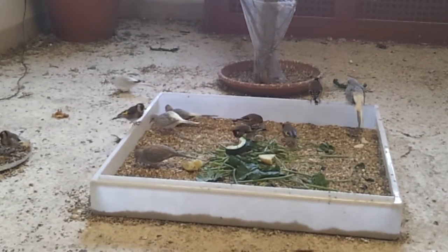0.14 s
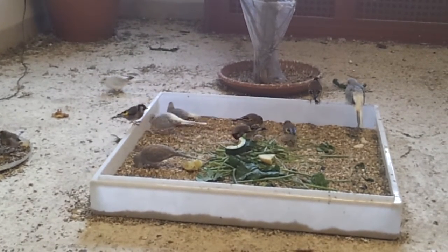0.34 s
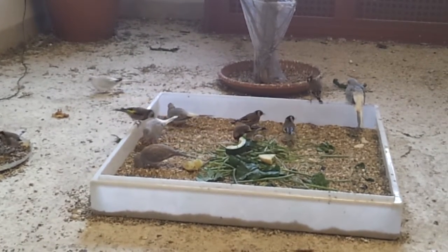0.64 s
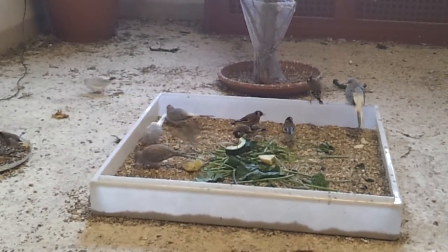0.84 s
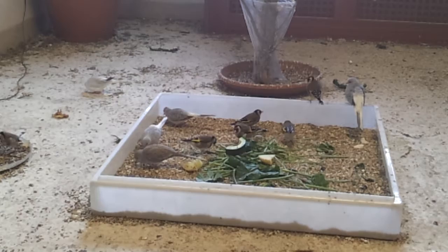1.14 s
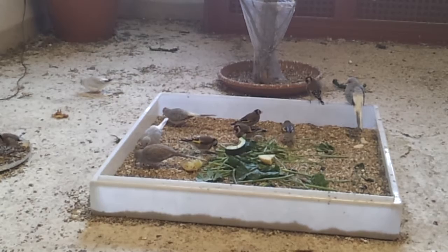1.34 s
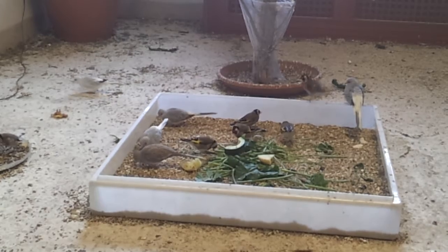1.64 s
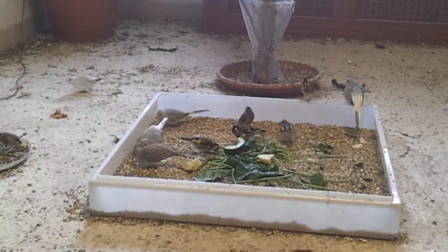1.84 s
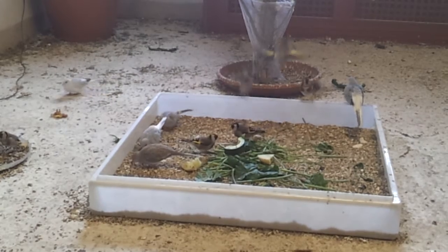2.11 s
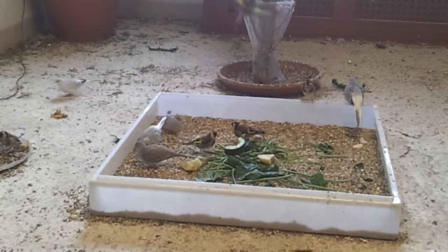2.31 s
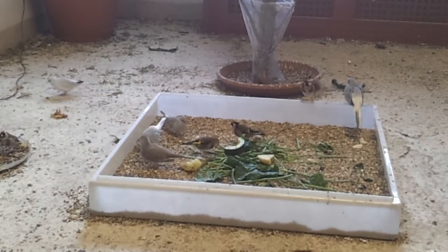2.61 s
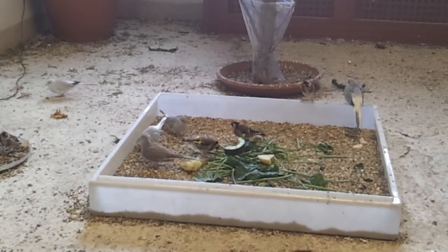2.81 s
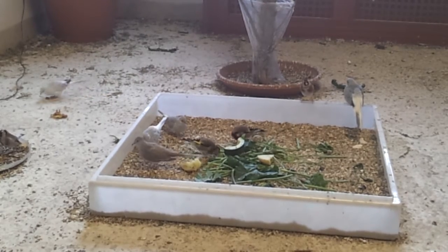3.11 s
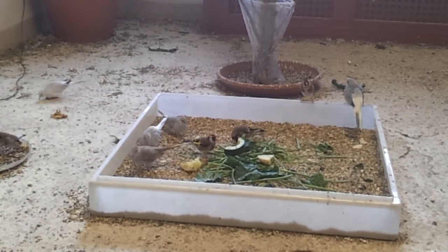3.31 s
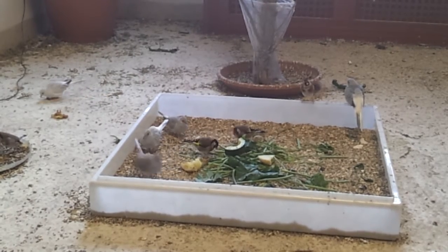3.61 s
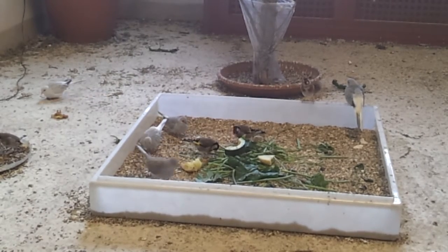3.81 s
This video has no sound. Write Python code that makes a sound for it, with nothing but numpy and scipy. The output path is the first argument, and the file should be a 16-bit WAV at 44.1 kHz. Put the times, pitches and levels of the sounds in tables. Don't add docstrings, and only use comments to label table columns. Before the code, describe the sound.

High, sharp finch twitter, near the microphone in a bare reverberant aviary, begins after quiet pecking and foot scuffs and a quick flurry of wing claps; wings whirr underneath and a rapid trill closes it.

```python
import sys
import numpy as np
from scipy import signal
from scipy.io import wavfile
from scipy.ndimage import minimum_filter1d

SR = 44100
rng = np.random.default_rng(int(sys.argv[2]) if len(sys.argv) > 2 else 0)


def to_wav(s):
    ch = np.atleast_2d(s).T
    pcm = np.round(np.clip(ch, -1, 1) * 32767)
    wavfile.write(sys.argv[1], SR, pcm.astype(np.int16))


def gain_from_db(level_db):
    decades = np.asarray(level_db, float) / 20
    return 10 ** decades


N = 174195

# start in seconds, length in seconds, start pitch in Hz, end pitch in Hz, level in dB.
SLURRED_NOTES = [(2.177, 0.015, 5020, 4180, -38), (2.184, 0.021, 4204, 4114, -35),
                 (2.256, 0.01, 4145, 4120, -25.5), (2.267, .015, 4070, 5030, -28),
                 (2.29, 0.016, 4980, 5400, -34), (2.285, 0.026, 4400, 3630, -31.5),
                 (2.385, 0.06, 5510, 5180, -36.5), (2.398, .012, 3264, 5250, -26.5),
                 (2.408, 0.021, 4530, 4010, -28.5), (2.425, 0.012, 4840, 5390, -37),
                 (2.472, 0.028, 5500, 5520, -35.5), (2.503, 0.032, 3826, 4790, -26.5),
                 (2.548, 0.031, 5286, 5220, -29.5), (2.61, 0.014, 2200, 3880, -36),
                 (2.615, 0.023, 5100, 5390, -34.5), (2.627, 0.018, 3950, 4500, -23),
                 (2.665, 0.026, 4270, 4330, -37.5), (2.665, 0.012, 5400, 5400, -44.5),
                 (2.69, 0.022, 3314, 3710, -33.5), (2.735, 0.017, 4450, 3240, -33),
                 (2.832, 0.022, 3810, 3610, -29), (2.89, 0.027, 3683, 4250, -31.5),
                 (2.9, 0.031, 4950, 5530, -40.5), (3.255, 0.075, 4950, 5560, -42)]
# start in seconds, level in dB.
CHIP_CALLS = [
    (2.953, -23.5),
    (3.07, -23.5),
    (3.186, -24),
    (3.305, -24),
    (3.386, -48),
]
# start in seconds, level in dB.
TRILL_SYLLABLES = [
    (3.469, -25.5),
    (3.542, -24),
    (3.616, -24.5),
    (3.69, -25),
    (3.76, -23.5),
    (3.835, -23),
    (3.91, -37),
]
# delay in seconds, length in seconds, start pitch in Hz, end pitch in Hz,
# level in dB.
SYLLABLE_PARTS = [
    (-.012, 0.05, 3234, 3620, -19),
    (0, 0.0347, 4224, 4424, -2.5),
    (0.026, 0.0275, 5103, 5256, 0.5),
    (0.031, 0.039, 6850, 6250, -16.5),
]
# start in seconds, length in seconds, start pitch in Hz, end pitch in Hz, level in dB.
CLEAR_NOTES = [(2.096, 0.014, 2764, 3335, -34), (2.104, 0.018, 3310, 3226, -29),
               (2.134, .012, 3265, 3280, -29), (2.213, 0.016, 3000, 2720, -29),
               (2.27, 0.021, 2990, 2500, -38), (2.388, 0.023, 2978, 2827, -28.5),
               (2.445, 0.0194, 3520, 3185, -30), (2.455, 0.025, 3317, 2740, -29.5),
               (2.49, 0.022, 3060, 3410, -37.5), (2.728, 0.011, 6600, 6600, -54),
               (2.795, 0.026, 3000, 3325, -31.5), (3.052, 0.022, 6480, 5710, -34.5),
               (3.178, 0.019, 3160, 3236, -28), (3.19, 0.027, 6100, 5830, -42),
               (3.29, 0.017, 3450, 3180, -32.5), (3.29, 0.023, 6270, 6230, -38),
               (3.372, 0.021, 7400, 7500, -40.5), (3.39, 0.018, 7790, 7920, -44.5),
               (3.4, 0.047, 5610, 5713, -23.5), (3.495, 0.036, 5660, 5610, -28.5),
               (3.92, 0.056, 5930, 6290, -23.5)]
SQUEAK_NOTE = [
    (2.357, 0.025, 6960, 6500, -30.5),
]
# start in seconds, length in seconds, start pitch in Hz, end pitch in Hz, level in dB.
HOARSE_NOTES = [
    (2.905, 0.022, 2810, 2680, -31.5),
    (3.0, .02, 1976, 2480, -43),
    (3.022, 0.031, 2802, 2374, -33),
    (3.1, 0.025, 2098, 2600, -46),
    (3.125, 0.038, 2693, 2966, -33),
    (3.265, 0.022, 2865, 2706, -29),
    (3.375, 0.021, 1800, 2520, -43.5),
]
# start in seconds, length in seconds, start pitch in Hz, end pitch in Hz, level in dB.
FAR_CHIRPS = [
    (.37, 0.037, 7800, 6200, -56.5),
    (.83, 0.026, 7500, 6300, -55),
    (1.33, 0.086, 6800, 6850, -59),
]

# start in seconds, peak in dB.
WING_CLAPS = [(1.8435, -20.5), (1.854, -32.5), (1.872, -18), (1.888, -29), (1.9005, -19.5), (1.912, -28),
              (1.924, -26.5), (1.932, -25), (1.945, -27), (1.9612, -20.5), (1.978, -27)]
# frequency in Hz, level in dB, 60 dB decay time in seconds.
CLAP_RESONANCES = [(542, -12, 0.02), (678, -13.5, 0.031), (1065, -12, 0.019), (1460, -15, 0.0032),
                   (1800, -13.5, 0.009), (2200, -14, 0.008), (4500, -16, 0.0044)]
# time in seconds, level in dB.
WHIRR_LEVEL = [(1.8, -87), (2.0, -48), (2.15, -39.5), (2.35, -34), (2.7, -33), (2.9, -41.5), (3.05, -38),
               (3.3, -37.5), (3.45, -46), (3.6, -48.5), (3.9, -66)]
# frequency in Hz, density in dB per Hz.
WHIRR_SPECTRUM = [(30, -32), (100, 0), (300, 3), (700, -9.5), (2000, -3.5), (7000, -1.5), (10000, -22),
                  (15000, -63.5)]

# start in seconds, peak in dB.
SEED_PECKS = [
    (0.5113, -36),
    (0.6534, -46),
    (0.823, -35),
    (1.265, -41),
    (1.3308, -33.5),
    (1.8125, -61),
    (2.2195, -37),
]
# start in seconds, peak in dB.
FOOT_SCUFFS = [(.38, -62), (.8, -41), (1.27, -39.5), (1.33, -38.5), (1.43, -36.5), (1.49, -60), (1.7, -45),
               (2.85, -31), (2.95, -33.5), (3.38, -33.5), (3.46, -46.5)]
# start in seconds, peak in dB.
RIM_KNOCKS = [
    (.8, -46),
    (2.1, -36),
    (2.28, -42),
    (3.13, -40),
    (3.19, -36),
]
# time in seconds, level in dB.
RUSTLE_LEVEL = [(0, -47), (.15, -51), (.42, -48), (.76, -53), (.83, -40), (1.05, -58), (1.25, -53),
                (1.34, -44.5), (1.65, -60), (1.85, -45.5), (2.1, -57)]
# frequency in Hz, density in dB per Hz.
SEED_SPECTRUM = [(710, -41.5), (1200, 9), (1870, 0), (2600, -6), (5270, 2), (7080, 7.5), (13900, -9.5),
                 (15000, -7)]

# time in seconds, level in dB.
MOTOR_LEVEL = [(0, -48), (2.6, -89), (3.1, -54), (3.3, -40.5), (3.5, -46.5), (3.95, -55.5)]
# time in seconds, level in dB.
AIR_SWELL = [(0, -49.5), (.25, -54.5), (.45, -43), (.85, -51), (1.05, -55), (1.25, -58), (1.45, -49),
             (1.8, -52.5), (2.3, -43), (3.3, -44.5), (3.6, -53.5), (3.95, -57)]
# frequency in Hz, density in dB per Hz.
AIR_SPECTRUM = [(21, -40), (35, -16), (64, -8), (151, -7), (357, -7.5), (750, -12.5), (2570, -21.5),
                (9000, -24), (11700, -60), (19800, -120)]
# frequency in Hz, rms level in dB.
HUM_PARTIALS = [(43, -53), (64, -52.5), (109, -58)]

# frequency in Hz, left-right likeness from -1 to 1.
EAR_LIKENESS = [(60, -0.15), (240, 0.94), (950, 0.095), (3770, -0.1), (15000, -0.057)]
# frequency in Hz, left minus right in dB.
EAR_LEAN = [(60, 6), (380, 0), (2380, -0.5), (15000, -6)]
# frequency in Hz, 60 dB decay time in seconds.
ROOM_DECAY = [(300, 1), (1500, 0.97), (4000, 0.83), (8000, 0.56), (14000, 0.089)]


def sing(notes, warble_hz, wobble_hz, breath_db, octave_db):
    attack_s, release_s, warble_per_s, fade_db = 0.0023, 0.0013, 70, -5.5
    out = np.zeros(N + SR)
    shake = rms_one(signal.lfilter([1], [1, -0.95], rng.standard_normal(N + SR)))
    hiss = np.diff(rng.standard_normal(N + SR + 1))
    for start, length, hz0, hz1, db in notes:
        t = np.arange(int(length * SR)) / SR
        i = int(start * SR)
        j = i + len(t)
        glide = hz0 + (hz1 - hz0) * np.sin(np.pi / 2 * t / length) ** 2
        warble = warble_hz * (t / length) ** 1.4 * np.sin(2 * np.pi * warble_per_s * t)
        phase = 2 * np.pi * np.cumsum(glide + warble + wobble_hz * shake[i:j]) / SR
        ramp = np.clip(np.minimum(t / attack_s, (length - t) / release_s), 0, 1)
        envelope = gain_from_db(db + fade_db * t / length) * np.sin(np.pi / 2 * ramp) ** 2
        voice = np.sin(phase) + gain_from_db(octave_db) * np.sin(2 * phase) + gain_from_db(breath_db) * hiss[i:j]
        out[i:j] += envelope * voice
    return out[:N]


def trill():
    notes = []
    for start, db in TRILL_SYLLABLES:
        for delay, length, hz0, hz1, part_db in SYLLABLE_PARTS:
            notes.append((start + delay, length, hz0 * rng.normal(1, 0.007), hz1, db + part_db))
    return sing(notes, warble_hz=30, wobble_hz=46, breath_db=-73, octave_db=-76)


def first_singer():
    slurs = sing(SLURRED_NOTES, warble_hz=118.4, wobble_hz=110, breath_db=-32.5, octave_db=-24)
    chip_notes = [(start, 0.034, 3990, 3950, db) for start, db in CHIP_CALLS]
    chips = sing(chip_notes, warble_hz=776, wobble_hz=87, breath_db=-42, octave_db=-47)
    return placed(slurs + chips + trill(), pan_db=-3, lag_s=0.000438, direct_db=6.5, room_db=9.5)


def second_singer():
    pips = sing(CLEAR_NOTES, warble_hz=30, wobble_hz=94.4, breath_db=-50, octave_db=-56)
    squeak = sing(SQUEAK_NOTE, warble_hz=146.6, wobble_hz=51, breath_db=-41, octave_db=-11)
    return placed(pips + squeak, pan_db=-6, lag_s=0.000357, direct_db=0, room_db=5)


def third_bird():
    croaks = sing(HOARSE_NOTES, warble_hz=250, wobble_hz=200, breath_db=-27.5, octave_db=-21)
    return placed(croaks, pan_db=-4, lag_s=0.00045, direct_db=-1.5, room_db=6)


def bursts(events, decay_s, low_hz, high_hz):
    clicks = np.zeros(N)
    for start, db in events:
        clicks[int(start * SR)] = gain_from_db(db)
    envelope = signal.lfilter([1], [1, -np.exp(-1 / (decay_s * SR))], clicks + 1e-18)
    return clicks, band_pass(envelope * rng.standard_normal(N), low_hz, high_hz)


def take_off():
    clicks, out = bursts(WING_CLAPS, decay_s=0.0023, low_hz=1150, high_hz=7500)
    out = out + gain_from_db(-4) * band_pass(clicks, 2000, 11000)
    for k, (hz, db, t60) in enumerate(CLAP_RESONANCES):
        r, w = gain_from_db(-60 / (t60 * SR)), 2 * np.pi * hz / SR
        ring = signal.lfilter([0, np.sin(w)], [1, -2 * r * np.cos(w), r * r], clicks + 1e-18)
        out = out + (-1) ** k * gain_from_db(db) * ring
    return band_pass(out, 420, 11500, order=3)


def claps_and_pecks():
    pecks = bursts(SEED_PECKS, decay_s=0.00058, low_hz=4950, high_hz=11500)[1]
    return placed(take_off() + gain_from_db(1) * pecks, pan_db=-3, lag_s=0.00041, direct_db=5.5, room_db=7.5)


def wing_whirr():
    wingbeat_hz, beat_db = 8.3, 2
    beat = beat_db * np.sin(2 * np.pi * wingbeat_hz * np.arange(N) / SR + 1.62)
    return gain_from_db(in_time(WHIRR_LEVEL) + beat) * banded_noise(WHIRR_SPECTRUM, patchy_db=1)


def rim_knocks():
    knocks = bursts(RIM_KNOCKS, decay_s=0.018, low_hz=400, high_hz=614)[1]
    return placed(knocks, pan_db=-2, lag_s=0.00035, direct_db=11, room_db=14)


def foot_scuffs():
    scuffs = bursts(FOOT_SCUFFS, decay_s=0.012, low_hz=1590, high_hz=3000)[1]
    return placed(scuffs, pan_db=0, lag_s=0.00068, direct_db=-8, room_db=2)


def seed_rustle():
    return gain_from_db(in_time(RUSTLE_LEVEL) - 5.5) * banded_noise(SEED_SPECTRUM, patchy_db=3.5)


def far_chirps():
    chirps = sing(FAR_CHIRPS, warble_hz=199, wobble_hz=200, breath_db=-7, octave_db=-40)
    return placed(chirps, pan_db=-1, lag_s=0.00013, direct_db=4, room_db=9.5)


def far_motor():
    phase = 2 * np.pi * 106.7 * np.arange(N) / SR + 1.5 * drift(5.1)
    return gain_from_db(in_time(MOTOR_LEVEL) + 2 * drift(6)) * np.sin(phase)


def room_air_and_hum():
    swell_db = in_time(AIR_SWELL)
    swell_db = swell_db - swell_db.mean()
    air = gain_from_db(-47 + 0.36 * swell_db) * banded_noise(AIR_SPECTRUM, patchy_db=0)
    hum = np.zeros(N)
    for hz, db in HUM_PARTIALS:
        phase = 2 * np.pi * hz * np.arange(N) / SR + 1.72 * drift(2.2)
        hum += gain_from_db(db + 1 + 1.9 * drift(7.5)) * np.sin(phase)
    return air + hum * gain_from_db(swell_db + np.array([[2.2], [-2.2]]))


def placed(x, pan_db, lag_s, direct_db, room_db):
    first_echo_s, early_s, early_db = 0.0025, 0.076, 1
    t = np.arange(SR) / SR
    white = rng.standard_normal((2, 2, SR))
    tail = np.zeros((2, SR))
    for k, (hz, sos) in enumerate(bands()[6:]):
        tail += signal.sosfilt(sos, white[k % 2]) * gain_from_db(-60 * t / at_hz(ROOM_DECAY, hz))
    tail *= np.clip(t / first_echo_s - 1, 0, 1)
    tail *= gain_from_db(early_db * np.clip((early_s - t) / 0.0094, 0, 1))
    tail /= np.sqrt(np.sum(tail ** 2) / 2)
    wet = signal.fftconvolve(x[None], tail, axes=1)[:, :N]
    late = np.interp(np.arange(N) - lag_s * SR, np.arange(N), x)
    both = gain_from_db(direct_db) * np.array([late, x]) + gain_from_db(room_db) * wet
    return both * gain_from_db([[pan_db / 2], [-pan_db / 2]])


def banded_noise(spectrum, patchy_db):
    out = np.zeros((2, N))
    white = rng.standard_normal((2, 2, N))
    sign = np.array([[1], [-1]])
    for k, (hz, sos) in enumerate(bands()):
        mid, side = signal.sosfilt(sos, white[k % 2])
        alike = np.clip(at_hz(EAR_LIKENESS, hz), -1, 1)
        pair = np.sqrt(1 + alike) * mid + np.sqrt(1 - alike) * side * sign
        level_db = at_hz(spectrum, hz) + at_hz(EAR_LEAN, hz) / 2 * sign + patchy_db * drift(21)
        out += gain_from_db(level_db) * pair * (spectrum[0][0] < hz * 1.5)
    return rms_one(out)


def bands():
    edges = 25 * 2 ** np.arange(0, 9.6, 0.5)
    return [(np.sqrt(a * b), signal.butter(2, [a, b], "band", fs=SR, output="sos"))
            for a, b in zip(edges, edges[1:])]


def band_pass(x, low_hz, high_hz, order=2):
    return signal.sosfilt(signal.butter(order, [low_hz, high_hz], "band", fs=SR, output="sos"), x)


def drift(rate):
    r = np.exp(-80 * np.pi * rate / SR)
    slow = signal.lfilter([1], [1, -2 * r, r * r], rng.standard_normal(N // 40 + 2002))[2000:]
    return np.interp(np.arange(N) / 40, np.arange(len(slow)), rms_one(slow))


def in_time(rows):
    return np.interp(np.arange(N) / SR, *np.transpose(rows))


def at_hz(points, hz):
    point_hz, values = np.transpose(points)
    return np.interp(np.log(hz), np.log(point_hz), values)


def rms_one(x):
    return x / np.sqrt(np.mean(x ** 2) + 1e-20)


def scene():
    out = first_singer() + second_singer() + third_bird()
    out += claps_and_pecks() + wing_whirr()
    out += rim_knocks() + foot_scuffs() + seed_rustle()
    return out + far_chirps() + far_motor() + room_air_and_hum()


def treble_gate(x):
    frame, group = 2048, 8
    from_hz, cutoff_hz = 7600, 14700
    gate_db, tilt_db_per_octave, luck_db = -45, 0.5, 4.4
    hz, _, z = signal.stft(np.pad(x, [(0, 0), (0, frame)], "reflect"), SR, nperseg=frame)
    hz, power = hz[1:, None], np.mean(np.abs(z[:, 1:]) ** 2, axis=0)
    band = power.reshape(-1, group, power.shape[1]).sum(axis=1)
    band = np.repeat(band * gain_from_db(2 * rng.exponential(luck_db, band.shape)), group, axis=0)
    held = -minimum_filter1d(-(power * (hz > 300)).sum(axis=0), size=7, origin=3)
    threshold_db = gate_db + tilt_db_per_octave * np.log2(hz / from_hz)
    over_db = 10 * np.log10(band / held + 1e-20) - threshold_db
    lucky = rng.random(over_db.shape) < 0.0052
    over_db = over_db + 24 * lucky
    over_db[:, -5:] = over_db[:, -6:-5]
    gain = np.clip(over_db / 2, 0, 1) * gain_from_db(7 * lucky)
    z[:, 1:] *= np.where(hz > from_hz, gain, 1) * (hz < cutoff_hz)
    return signal.istft(z, SR, nperseg=frame)[1][:, :N]


def roll_off(x):
    return signal.sosfilt(signal.butter(12, 15690, fs=SR, output="sos"), x)


def record(dry):
    high_pass = signal.butter(2, 7000, "high", fs=SR, output="sos")
    hiss = signal.sosfilt(high_pass, rng.standard_normal(dry.shape))
    mix = treble_gate(dry + gain_from_db(-55) * hiss)
    return roll_off(mix)


dry = scene()
out = record(dry)
to_wav(out)
```